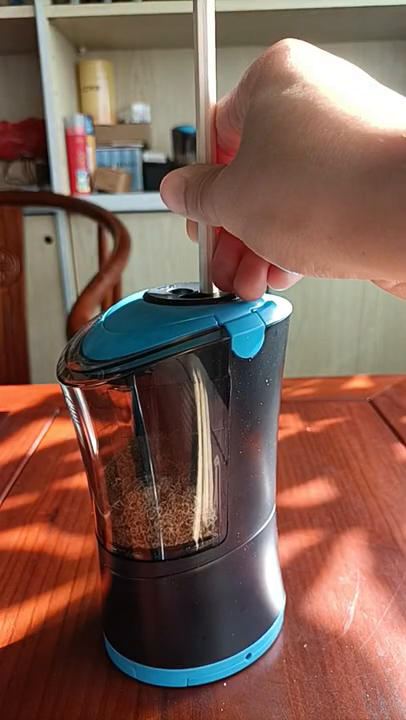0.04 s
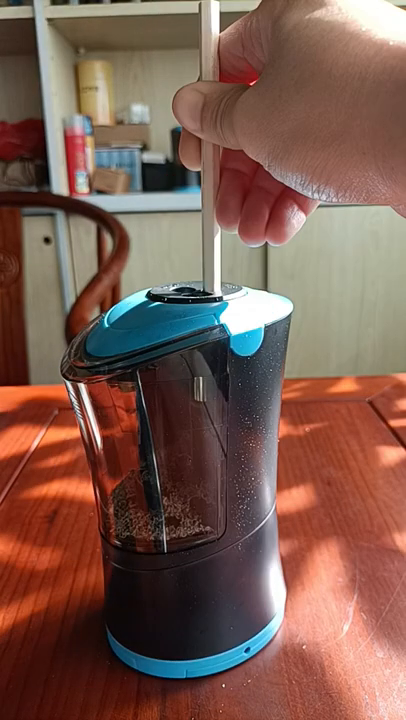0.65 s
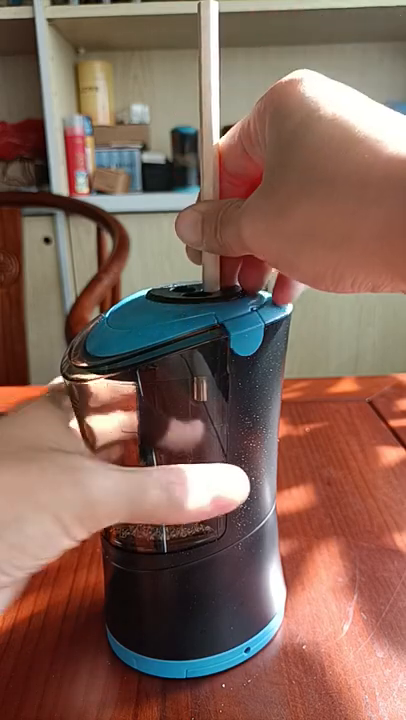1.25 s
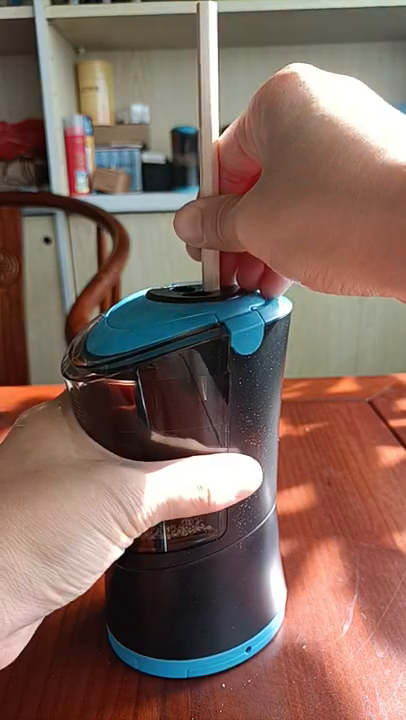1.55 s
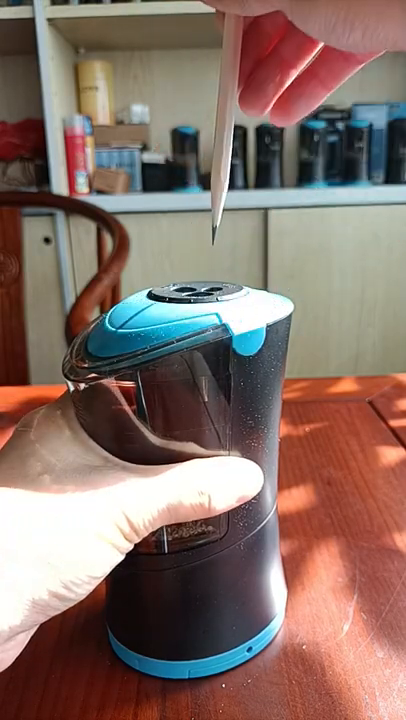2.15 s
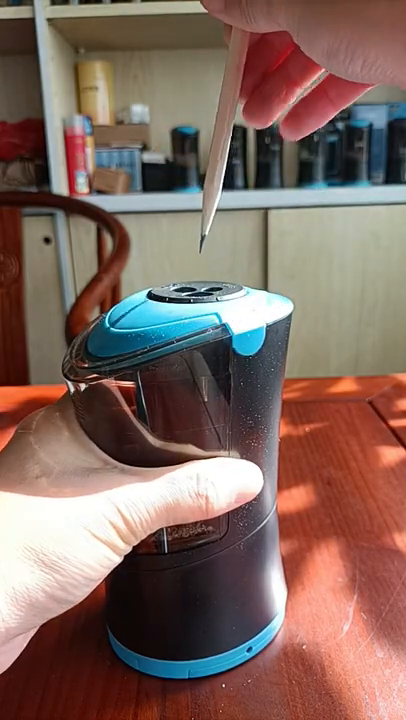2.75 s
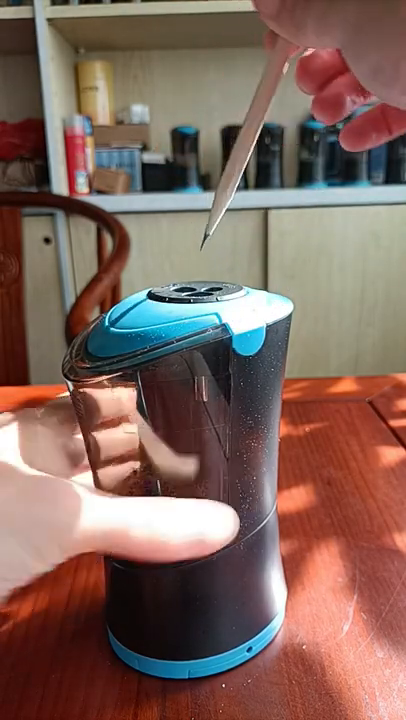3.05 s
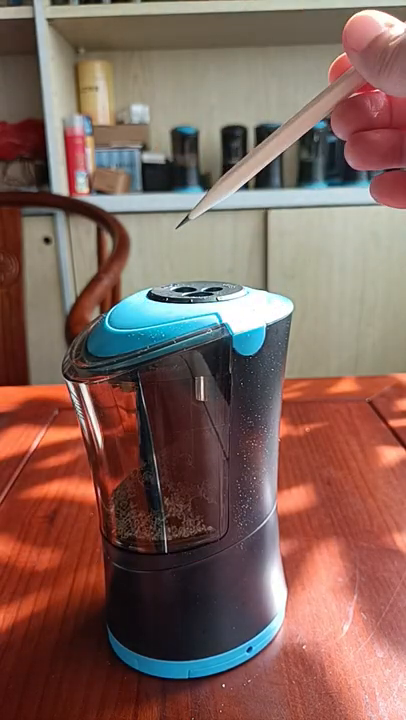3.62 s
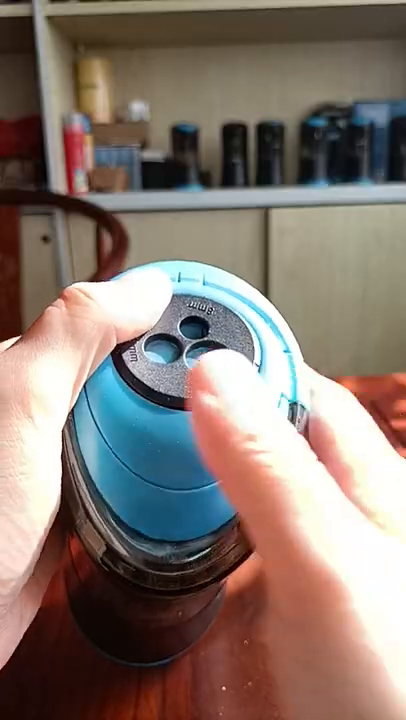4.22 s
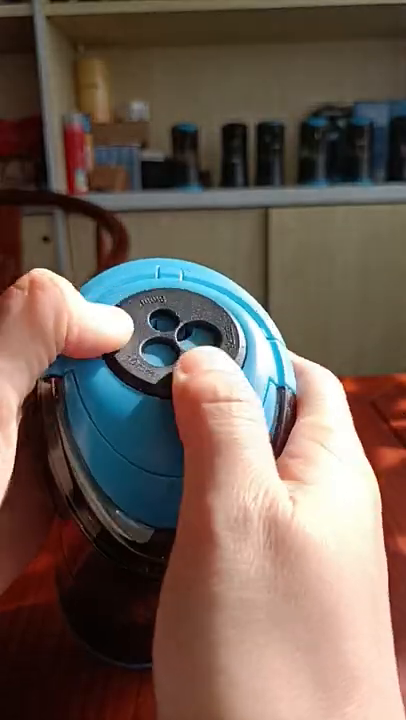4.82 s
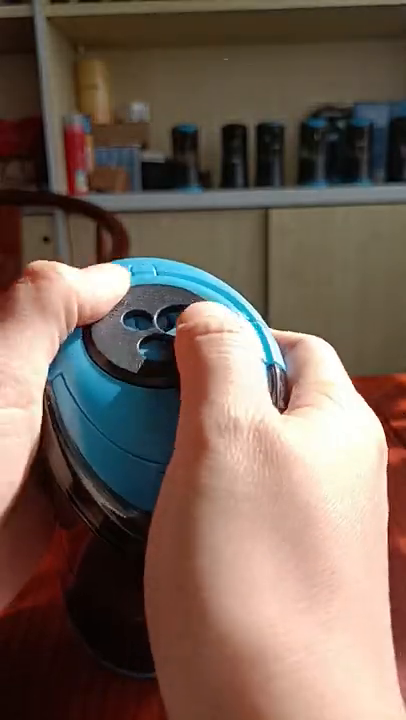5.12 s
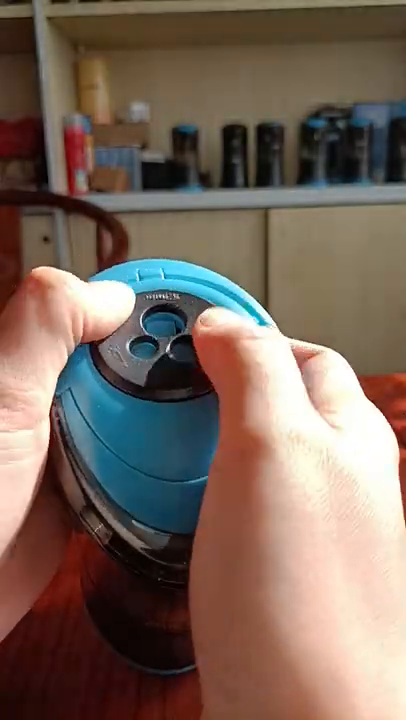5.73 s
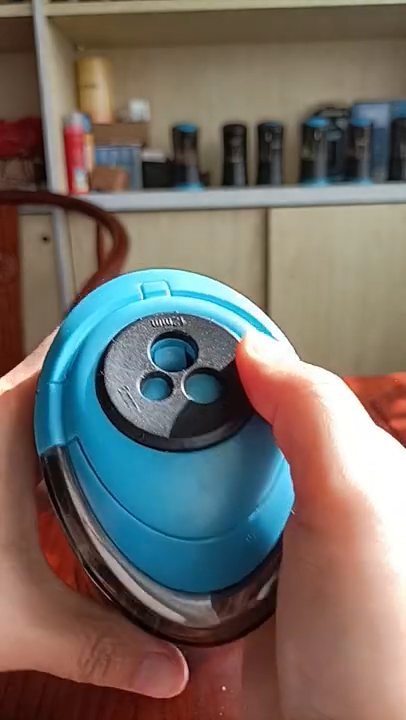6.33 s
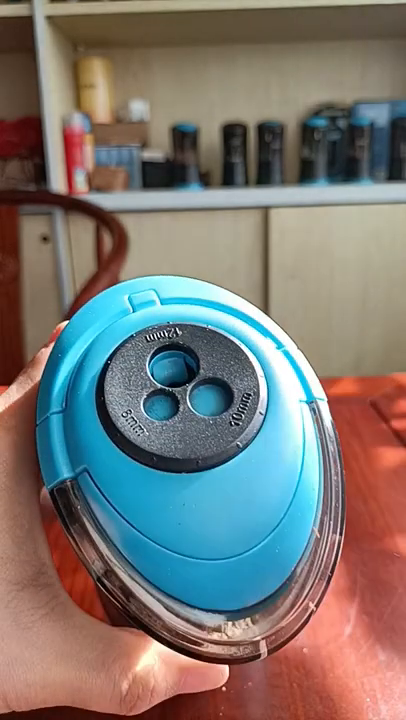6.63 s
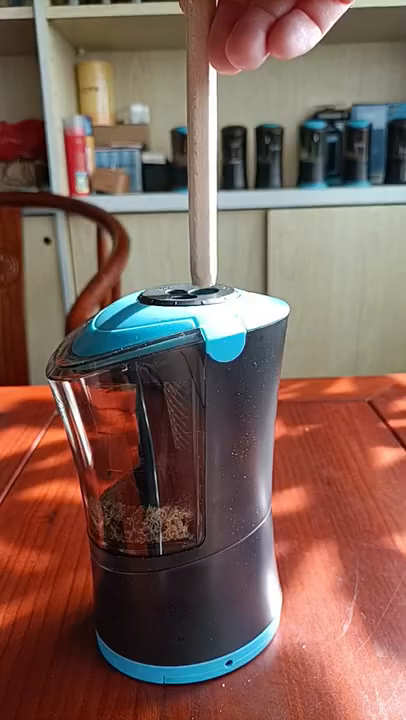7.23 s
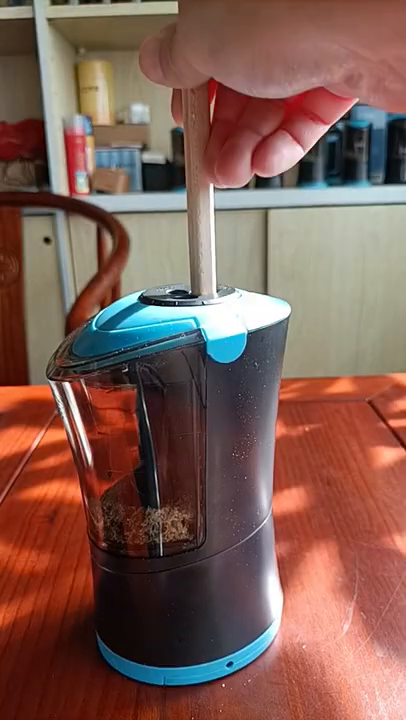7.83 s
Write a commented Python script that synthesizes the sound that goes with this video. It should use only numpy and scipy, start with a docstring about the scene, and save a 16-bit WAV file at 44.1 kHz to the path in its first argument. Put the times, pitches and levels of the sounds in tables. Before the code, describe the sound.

An electric pencil sharpener is already running loudly, close to the microphone in a small room. Its gears whine and sag in pitch while the blade rasps through wood and the case rumbles on the table. It stops at about 0.6 seconds. A soft finger bump follows near 1.1 seconds, then the pencil knocks in the socket at 1.7 and 2 seconds and slides out with a tiny squeak. After a quiet stretch, a faint low hum runs from about 4 to 7 seconds. Between 4.6 and 5 seconds the plastic size dial turns with a quick run of clicks, a judder and a springy snap. Scattered lighter clicks, finger bumps and soft rubbing continue until about 7.2 seconds. The pencil taps lightly in the socket around 7.6 seconds, and just after 7.8 seconds a sharp knock comes as the cutter briefly rasps again.

```python
"""Battery pencil sharpener, close up

On a wooden table in a small room, close to a stereo microphone, the gears whine and sag as the cutter
shaves a pencil. The pencil knocks in the socket and is pulled out; hands grip the plastic case and click
the size dial round over a low hum. At the very end the cutter bites again. The level dips three times."""
import sys
import numpy as np
from scipy import signal
from scipy.fft import rfft, irfft, next_fast_len
from scipy.io import wavfile

SR = 44100
rng = np.random.default_rng(int(sys.argv[2]) if len(sys.argv) > 2 else 0)


def int16_out(signal):
    """Quantize to a 16-bit WAV file."""
    q = np.round(np.clip(np.atleast_2d(signal).T, -1, 1) * 32767)
    wavfile.write(sys.argv[1], SR, q.astype(np.int16))


N = 347067
TIME = np.arange(N) / SR

# Levels in the tables are relative; each source adds its own gain.
# mesh rate of the pinion, sagging with each harder cut: time_s, teeth_per_s
MESH_RATE = [(0.0, 1126), (0.092, 1204), (0.134, 1133), (0.21, 1207), (0.266, 1150), (0.29, 1173),
             (0.352, 1119), (0.37, 1079), (0.382, 1100), (0.394, 1050), (0.414, 1038), (0.458, 1071),
             (0.494, 1034), (0.575, 1104)]
# gear tones, led by the pinion's mesh and its overtones: multiple_of_motor_speed, level_db
GEAR_TONES = [(1.39, -15.5), (2, -15), (8, -5), (9, -22), (11, -26), (13, -17), (16, -3), (18, -17),
              (20, -20.5), (21, -15.5), (22, -15), (23, -7.5), (24, -2), (25, -20.5), (30, -22), (32, -15),
              (40, -21)]
# blade on wood, as it leaves the case: frequency_hz, density_db
RASP_SPECTRUM = [(200, -16), (420, -5), (700, 3), (950, -5.5), (1250, 3.5), (1480, -2.5), (2300, 4),
                 (2800, -0.5), (3350, 3.5), (3800, -5.5), (4400, -1.5), (5200, -4.5), (8600, -3),
                 (12500, -8.5), (13500, -22.5)]
# where rasp and whine sit at the microphone: frequency_hz, left_minus_right_db
CUTTER_PAN = [(700, 4), (1120, -1), (1400, 0), (3300, 7), (5200, 0), (7000, 8), (7900, -14), (9500, -9),
              (10300, -1), (11000, -4), (12700, 0), (15000, 10)]
# the case rumbling on the table: frequency_hz, density_db
RUMBLE_SPECTRUM = [(70, -29.5), (125, -14), (160, -6.5), (203, 0.5), (230, -8.5), (280, -3), (390, -3),
                   (470, -18), (900, -37)]
# the quiet room: frequency_hz, density_db
ROOM_TONE_SPECTRUM = [(20, -1.5), (36, -15), (55, -1.5), (80, -16), (190, -13.5), (330, -17), (450, -26),
                      (700, -27.5), (2500, -35), (5900, -48), (15000, -49.5)]
# colour of the room's reflections: frequency_hz, level_db
REFLECTION_SPECTRUM = [(80, -12.5), (250, 5), (1000, 1), (6000, 0), (15000, -4.5)]
# how alike the microphone's two sides are: frequency_hz, correlation
STEREO_LIKENESS = [(100, 0.95), (290, 0.98), (640, 0.29), (1400, 0), (3000, 0), (15000, 0)]
# fingers landing on the case: start_s, level_db
FINGER_BUMPS = [(1.104, -39), (4.612, -31.5), (5.064, -35), (5.313, -31), (6.596, -36)]
# the pencil in the socket: start_s, level_db, thud_over_clack_db, chatter_t60_s
SOCKET_KNOCKS = [(1.677, -26.5, 10.5, 0.062), (1.683, -22, -13, 0.031), (1.692, -30.5, 12, 0.24),
                 (1.948, -26, -3.5, 0.028), (1.958, -20.5, -22.5, 0.079), (7.553, -47.5, 9, .022),
                 (7.644, -48, 15, .12), (7.656, -45, 18.5, 0.094), (7.859, -15.5, 3, .12)]
# clicks of the dial, and of the pencil tip on it: start_s, level_db, tick_over_clack_db
DIAL_CLICKS = [(4.587, -38.5, -22), (4.621, -36, -7.5), (4.66, -24.5, -4), (4.706, -28, -13),
               (4.796, -24, -12), (4.826, -21, -8.5), (4.849, -26, -6), (4.919, -25.5, -11),
               (5.133, -35, -11), (5.277, -37, 0.5), (5.846, -33, 1.5), (6.013, -41, 0), (6.136, -48.5, 8),
               (7.169, -68, 25.5)]
# low, middle and high modes of the plastic case: pitch_hz, width_hz, level_db
THUD_MODES = [(115, 47.5, 1.5), (173, 38, -10), (184, 112, -1.5), (282, 38, 2)]
CLACK_MODES = [(380, 54, -5.5), (690, 124, -1.5), (897, 110, 5), (1286, 110, 4), (1720, 197, 3.5),
               (2450, 306, 3.5), (3390, 220, -7.5)]
TICK_MODES = [(4110, 1000, 3), (6790, 300, 4), (8090, 300, 3), (10400, 4800, -5.5), (14700, 930, -5.5)]
# skin and pencil sliding on plastic: middle_s, half_length_s, level_db
SLIDE_SWELLS = [(1.211, 0.18, -61), (1.497, 0.0086, -52.5), (1.949, 0.028, -45), (4.338, 0.0058, -49),
                (4.384, 0.017, -55.5), (4.9, .008, -42), (4.8, .1, -55.5), (5.13, .12, -55.5),
                (5.362, .062, -50.5), (6.153, .036, -56), (6.564, .051, -55.5), (6.944, 0.023, -55)]
# colour of that friction: frequency_hz, density_db
SLIDE_SPECTRUM = [(300, -3), (1500, 3), (3000, 2), (5000, -2.5), (7000, 0), (10000, -3), (15000, -6.5)]
# thin squeaks as pencil and case are handled: start_s, end_s, pitch_hz, level_db
HANDLING_SQUEAKS = [(1.889, 1.948, 2390, -54), (4.3, 5.0, 2586, -70.5), (6.585, 6.616, 3230, -51.5),
                    (6.733, 7.04, 13300, -67.5)]
# a faint whistle, heard twice: start_s, end_s, level_db
WHISTLE_SPANS = [(2.18, 2.707, -77.5), (7.65, 7.821, -71)]
# its two tones: pitch_hz, level_db
WHISTLE_PAIR = [(3660, 2.5), (3265, -2)]
# low hum while the case is held: time_s, level_db
HUM_LEVEL = [(3.86, -48), (4.04, -36), (5.01, -35.5), (5.43, -61), (5.63, -55), (5.69, -75), (5.81, -54),
             (6.24, -39), (6.3, -48.5), (6.43, -35.5), (6.63, -43), (6.72, -38.5), (7.01, -39.5),
             (7.03, -44)]
# faint background hiss: frequency_hz, density_db
HISS_SPECTRUM = [(200, 11), (500, 2.5), (2500, -4), (4500, -14.5), (8000, -17), (15000, -24)]
# the dial's detent spring snapping home: start_s, level_db
DETENT_SNAPS = [(4.649, -39.5), (4.658, -16), (4.706, -48), (5.845, -30.5), (7.836, -18)]
# ring of that spring: pitch_hz, width_hz, level_db
SPRING_MODES = [(2030, 230, 2.5), (2594, 437, 5.5), (2756, 254, 7.5)]
# white noise: frequency_hz, density_db
WHITE = [(100, 0), (15000, 0)]

MOTOR_STOP_S, PINION_TEETH = .58, 8
DIPS_S, DIP_LENGTH_S = [.576, 3.826, 7.030], .034


def from_db(db):
    """Decibels to gain."""
    return 10 ** (np.asarray(db) / 20)


def at_hz(points, hz):
    """Read a spectrum on a log-frequency axis."""
    f, value = np.transpose(points)
    return np.interp(np.log(hz), np.log(f), value)


def pan(side_db):
    """Left and right gains for a level difference."""
    return from_db(np.array([[.5], [-.5]]) * side_db)


def drift(rate_hz, size=N):
    """A random wander of spread about 1, turning rate_hz times a second."""
    return np.interp(TIME[:size] * rate_hz, np.arange(8192), rng.standard_normal(8192))


def noise(spectrum, sides=((1000, 0),)):
    """Coloured stereo noise of rms 1, its bass alike on both sides of the microphone."""
    size = next_fast_len(N, True)
    hz = np.maximum(np.arange(size // 2 + 1) * SR / size, 1)
    mid, side = rfft(rng.standard_normal((2, size)))
    alike = np.clip(at_hz(STEREO_LIKENESS, hz), -1, 1)
    both = np.sqrt(1 + alike) * mid + np.sqrt(1 - alike) * side * [[1], [-1]]
    coloured = irfft(both * from_db(at_hz(spectrum, hz)) * pan(at_hz(sides, hz)), size)[:, :N]
    return coloured / np.sqrt(np.mean(coloured ** 2) + 1e-20)


def resonate(x, modes):
    """Parallel resonances with alternating signs."""
    out = 0
    for k, (hz, width, db) in enumerate(modes):
        r = np.exp(-np.pi * width / SR)
        zeros = np.array([1, 0, -1]) * (1 - r * r) / 2
        poles = [1, -2 * r * np.cos(2 * np.pi * hz / SR), r * r]
        out = out + (-1) ** k * from_db(db) * signal.lfilter(zeros, poles, x + 1e-18)
    return out


def gear_whine(turns, load, slack_turns=.0024, flutter_db=3.0, harden_db=9.5):
    """Tones locked to the motor; play in the teeth shakes the high ones most, load hardens the mesh."""
    size, out = SR, np.zeros((2, N))   # the motor stops within the first second
    angle = turns[:size] + slack_turns * drift(330, size)
    for order, db in GEAR_TONES:
        phase = 2 * np.pi * (order * angle + rng.random())
        # short waves reach the two sides of the microphone out of step
        spread = np.array([[.5], [-.5]]) * min(order / PINION_TEETH, 2) * np.pi / 4
        hardening_db = harden_db * load[:size] * (order > 3 * PINION_TEETH)
        level_db = db + flutter_db * drift(110, size) + hardening_db
        sides = pan(at_hz(CUTTER_PAN, order * MESH_RATE[0][1] / PINION_TEETH))
        out[:, :size] += from_db(level_db) * sides * np.sqrt(2) * np.sin(phase + spread)
    return out


def blade_rasp(turns, throb=.3, uneven_db=2.4):
    """The blade takes off uneven chips of wood, throbbing once a motor turn."""
    chips = (1 + throb * np.cos(2 * np.pi * turns)) * from_db(uneven_db * drift(700))
    return chips * noise(RASP_SPECTRUM, CUTTER_PAN)


def case_rumble(running, biting, sway_db=2.5, peak_s=.245, period_s=.21):
    """The case rumbles on the table, swelling and sinking as the cutter circles the pencil."""
    sway = from_db(sway_db * np.cos(2 * np.pi * (TIME - peak_s) / period_s))
    return (running * sway + biting) * noise(RUMBLE_SPECTRUM) * pan(3.0)


def sharpener(whine_db, rasp_db, rumble_db, press_s=.368, muffle_db=5.5, bite_s=7.841):
    """The motor drives gears and cutter, then stops; rasp and rumble return with the last bite."""
    turns_per_s = np.interp(TIME, *np.transpose(MESH_RATE)) / PINION_TEETH
    turns = np.cumsum(turns_per_s) / SR
    load = (turns_per_s.max() - turns_per_s) / np.ptp(turns_per_s)   # a harder cut slows the motor
    pressed = np.clip((TIME - press_s) / .02 + .5, 0, 1)   # pushing the pencil in muffles the whine
    running = np.clip((MOTOR_STOP_S - TIME) / .008 + .5, 0, 1)
    biting = from_db(.4 + 700 * np.clip(TIME - bite_s, -.5, 0))   # rises 700 dB a second to a full cut
    whine = from_db(whine_db - muffle_db * pressed) * running * gear_whine(turns, load)
    rasp = from_db(rasp_db) * (running + biting) * blade_rasp(turns)
    rumble = from_db(rumble_db) * case_rumble(running, biting)
    return whine + rasp + rumble


def room_tone(level_db):
    """The steady, low background of the small room."""
    return from_db(level_db) * noise(ROOM_TONE_SPECTRUM) * pan(1.0)


def room_reflections(x, t60_s, wet_db):
    """Diffuse reflections reach the microphone 5 ms after the direct sound and die away."""
    age = TIME[:SR // 2]
    tail = noise(REFLECTION_SPECTRUM)[:, :len(age)] * from_db(-60 * age / t60_s) * (age > .005)
    tail /= np.sqrt(np.sum(tail ** 2) / 2)
    return from_db(wet_db) * signal.fftconvolve(x, tail, axes=1)[:, :N]


def contacts(judder_s=4.721, judder_gap_s=.0145):
    """Soft touches thud, hard ones tick: start_s, thud_db, clack_db, tick_db, chatter_t60_s."""
    fingers = [(s, db, db - 9, db - 13, .031) for s, db in FINGER_BUMPS]
    pencil = [(s, db + soft, db, db - 6 - .16 * soft, t60) for s, db, soft, t60 in SOCKET_KNOCKS]
    clicks = [(s, db - 5, db, db + bright, .021) for s, db, bright in DIAL_CLICKS]
    # between two notches the dial judders in a short run of bumps
    slips = judder_s + judder_gap_s * (np.arange(4) + rng.uniform(-.21, .212, 4))
    judder = [(s, -27, -36, -50, .021) for s in slips]
    return fingers + pencil + clicks + judder


def case_knocks(thud_gain_db, clack_gain_db, tick_gain_db):
    """Each contact gives the case one push and a short burst of chatter that rings its higher modes."""
    push, clack, tick = np.zeros((3, N))
    for start_s, thud_db, clack_db, tick_db, t60_s in contacts():
        at = int(start_s * SR)
        age = TIME[:min(SR // 5, N - at)]
        burst = from_db(-60 * age / t60_s) * (1 - np.exp(-age / .00025))
        push[at] += from_db(thud_db)
        clack[at:at + len(burst)] += from_db(clack_db) * burst
        tick[at:at + len(burst)] += from_db(tick_db) * burst
    chatter = noise(WHITE)
    soft_push = resonate(push, [(205, 320, 0)])   # the grip rounds off the push
    thuds = from_db(thud_gain_db) * resonate(soft_push, THUD_MODES)
    clacks = from_db(clack_gain_db) * resonate(clack * chatter, CLACK_MODES)
    ticks = from_db(tick_gain_db) * resonate(tick * chatter, TICK_MODES)
    return (thuds + clacks + ticks) * pan(3.5)


def slides(gain_db, grain_db=3.0):
    """Skin and pencil rub over the plastic in soft swells of grainy friction."""
    swell = sum(from_db(db) * np.exp(-.5 * ((TIME - s) / half) ** 2) for s, half, db in SLIDE_SWELLS)
    return swell * from_db(gain_db + grain_db * drift(400)) * noise(SLIDE_SPECTRUM) * pan(4.1)


def squeaks_and_whistles(flutter_db=3.2, waver=.0049, fade_s=.021):
    """Thin handling squeaks and a faint two-tone whistle, unsteady in pitch and level."""
    whistles = [(start, end, hz, db + tone_db)
                for start, end, db in WHISTLE_SPANS for hz, tone_db in WHISTLE_PAIR]
    out = np.zeros(N)
    for start, end, hz, db in HANDLING_SQUEAKS + whistles:
        fade = np.clip(np.minimum(TIME - start, end - TIME) / fade_s, 0, 1)
        level = from_db(db + flutter_db * drift(30))
        phase = 2 * np.pi * hz * np.cumsum(1 + waver * drift(340)) / SR
        out += level * fade * np.sqrt(2) * np.sin(phase)
    return out


def hum_and_hiss(hum_hz, waver_hz, hiss_db):
    """Between the last two dips a low hum wavers and the faint background hiss is a little louder."""
    between_dips = (TIME > DIPS_S[1] + DIP_LENGTH_S) & (TIME < DIPS_S[2] + DIP_LENGTH_S)
    hum_db = np.interp(TIME, *np.transpose(HUM_LEVEL))
    phase = 2 * np.pi * np.cumsum(hum_hz + waver_hz * drift(17)) / SR
    hum = from_db(hum_db) * np.sqrt(2) * np.sin(phase) * pan(1.0)
    return between_dips * (hum + from_db(hiss_db) * noise(HISS_SPECTRUM))


def detent_spring(gain_db, skid_s=.0016):
    """The dial's spring skids briefly over its notch and rings."""
    skid = sum(from_db(db) * np.exp(-.5 * ((TIME - s - skid_s) / skid_s) ** 2) for s, db in DETENT_SNAPS)
    return from_db(gain_db) * resonate(skid * noise(WHITE), SPRING_MODES)


def scene():
    """The sharpener and the hands on it, close to the microphone, with the small room behind."""
    motor = sharpener(whine_db=-20.5, rasp_db=-22.0, rumble_db=-31.5)
    knocks = case_knocks(thud_gain_db=42.0, clack_gain_db=5.5, tick_gain_db=3.5)
    hands = knocks + detent_spring(gain_db=10.5) + slides(gain_db=-2.0)
    reflections = room_reflections(hands + from_db(-13.5) * motor, t60_s=.3, wet_db=-10.5)
    background = hum_and_hiss(hum_hz=54, waver_hz=1.34, hiss_db=-56.5) + room_tone(level_db=-50)
    return motor + hands + reflections + background + squeaks_and_whistles()


def record(dry):
    """The level dips briefly three times, and the treble ends at 15.8 kHz."""
    dips = sum(np.clip((TIME - s) / .018, 0, 1) ** 2 * (TIME < s + DIP_LENGTH_S) for s in DIPS_S)
    top_cut = signal.ellip(12, .2, 90, 15800, fs=SR, output="sos")
    return signal.sosfilt(top_cut, dry * from_db(-26.0 * dips))


dry = scene()
out = record(dry)
int16_out(out)
```